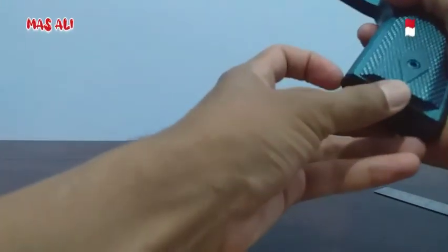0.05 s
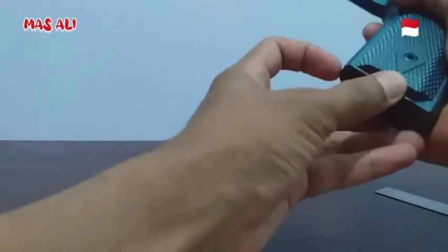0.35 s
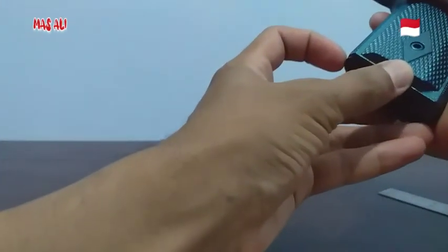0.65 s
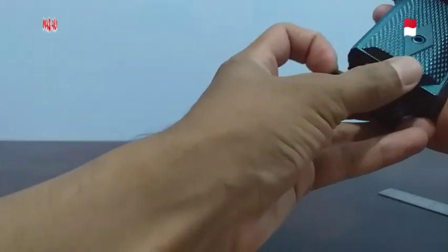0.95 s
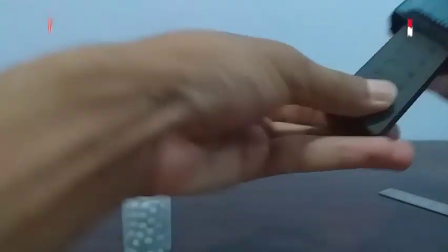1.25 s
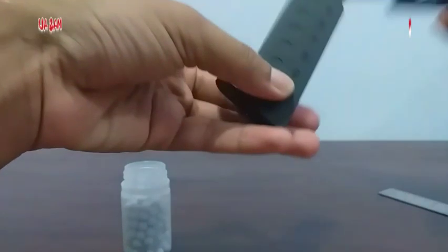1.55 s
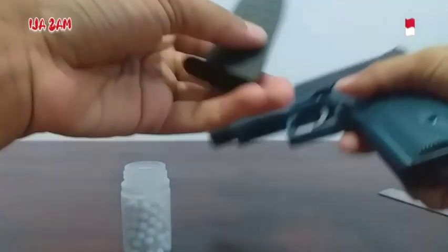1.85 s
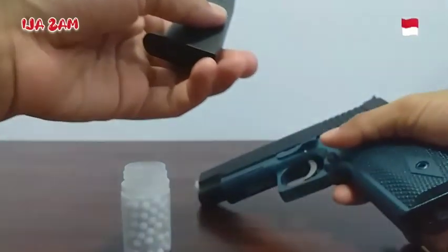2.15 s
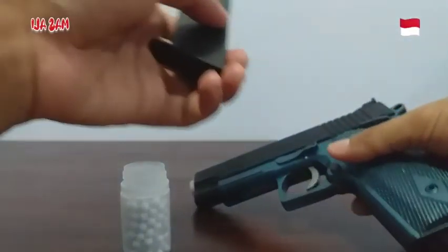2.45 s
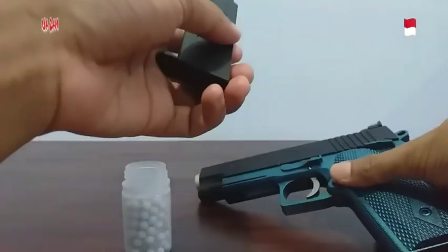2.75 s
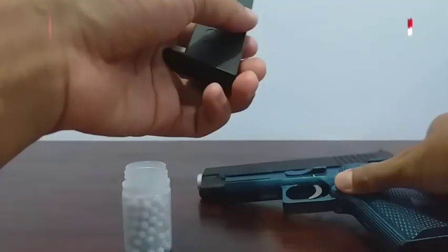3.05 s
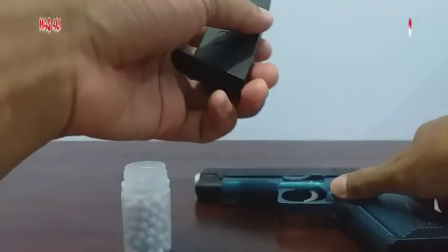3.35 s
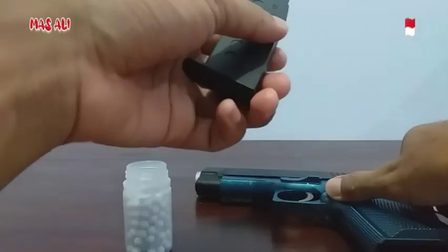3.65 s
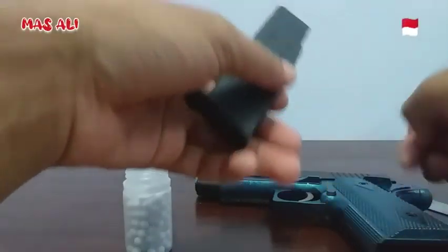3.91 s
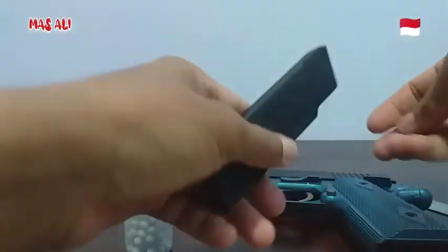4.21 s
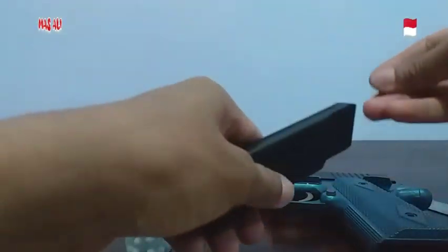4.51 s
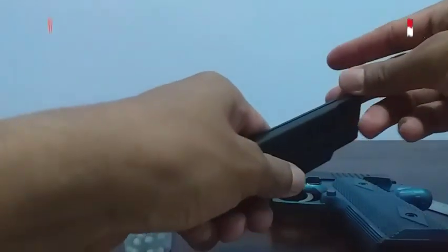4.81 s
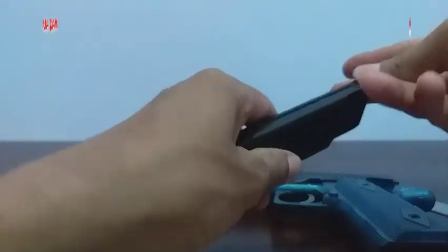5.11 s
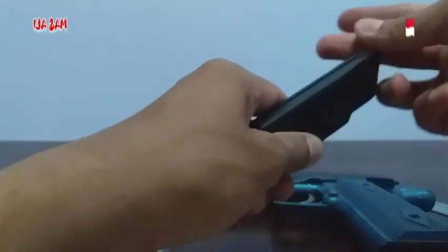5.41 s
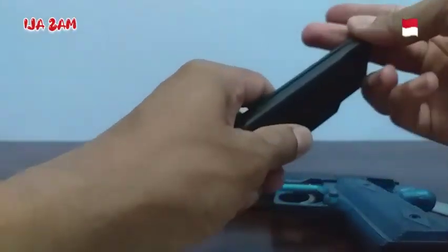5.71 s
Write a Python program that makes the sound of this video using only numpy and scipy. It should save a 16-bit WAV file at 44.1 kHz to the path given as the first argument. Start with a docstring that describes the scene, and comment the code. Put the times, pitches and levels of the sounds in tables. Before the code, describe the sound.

Close plastic clicks and a short scrape, a booming thump on a table, then a sharp spring snap and clack in a small room.

```python
"""A small, bare room, a stereo microphone close to a wooden table, the action straight ahead.
A plastic spring pistol is handled: the catch clicks and the magazine scrapes out, ever faster.
The muzzle taps the table; the pistol is laid down with a boom and pushed along the top.
The magazine's spring follower snaps and chatters, so hard that the limiter ducks and slowly recovers,
and its lips clack under the fingers. Low room tone and microphone hiss lie behind it all."""
import sys
import numpy as np
from scipy import signal
from scipy.fft import rfft, irfft, next_fast_len
from scipy.io import wavfile
from scipy.ndimage import uniform_filter1d, minimum_filter1d, map_coordinates

SR = 44100
rng = np.random.default_rng(int(sys.argv[2]) if len(sys.argv) > 2 else 0)


def log_audio(samples):
    """Write samples as a 16-bit WAV file to the path given in sys.argv[1]."""
    # one column per channel
    frames = np.atleast_2d(samples).T
    # limit to full scale, then quantise
    limited = np.clip(frames, -1, 1)
    pcm = np.round(limited * 32767).astype(np.int16)
    wavfile.write(sys.argv[1], SR, pcm)


N = 258911

# Plastic contacts in the grip, close up.
# Each row: start in seconds, level in dB, scuff length in seconds, brightness in dB per octave.
GRIP_CLICKS = [(0.362, -54, 0.011, -3), (.397, -47, 0.014, 3.5), (0.503, -56.5, 0.0087, 2),
               (.632, -38.5, 0.011, 2), (0.8431, -34.5, .05, 0.5), (.859, -32, 0.024, -0.5),
               (0.9586, -43.5, 0.0046, -1), (1.0765, -45, 0.0042, 9), (1.153, -33.5, 0.031, 0),
               (1.171, -30.5, 0.019, -1), (1.209, -31.5, 0.0043, 4), (1.228, -25, 0.011, 0.5),
               (1.248, -35, 0.021, 6.5), (1.461, -50.5, 0.0035, 3.5), (1.608, -49.5, 0.0084, 3)]
# The colour of the hollow grip. Each row: frequency in Hz, level in dB.
GRIP_COLOUR = [(100, -18), (600, -10), (810, 4.5), (1050, 0.5), (1300, 4), (1650, 0), (2100, 2),
               (3000, -3.5), (4200, -6.5), (6000, -7), (7700, -12), (9000, -23), (15500, -25)]
# The ring of its shell. Each row: frequency in Hz, level in dB, time to fall 60 dB in seconds.
GRIP_MODES = [(863, 5, 0.042), (998, 8, 0.036), (1410, -1, 0.02), (2036, 3.5, 0.036), (2595, -7.5, 0.02),
              (3414, 4, 0.024), (4230, 1.5, 0.014), (5320, -8.5, 0.015), (5970, -9.5, 0.018)]
def grip():
    """The catch lets go and one quickening pull scrapes the magazine out through the hollow grip."""
    clicks = blows(GRIP_CLICKS, GRIP_COLOUR, GRIP_MODES,
                   ring_db=-8, scuff_db=27, wet_db=-8, rise_s=0.00077)
    shell = body(GRIP_COLOUR, tilt_db=3) + amp(-6.5) * ring(GRIP_MODES)
    grit = unit(signal.fftconvolve(slips(rate=4000, spread_db=3.5), shell)[:N])
    pull = stroke(start_s=1.042, length_s=0.19, db=-32, swell_db=18, attack_s=0.002, release_s=0.0081)
    scrape = room(pull * grit, wet_db=-11.5)
    return clicks + scrape + hand_thuds([(s, db - 28) for s, db, _, _ in GRIP_CLICKS])


# The follower's snaps; the third is the loudest thing at the microphone.
# Each row: start in seconds, level in dB, level of the thud in the hand in dB.
SNAPS = [(4.766, -32, -42), (4.793, -39.5, -60), (5.07, -2.5, -24), (5.403, -43, -70)]
# The follower's bright colour. Each row: frequency in Hz, level in dB.
FOLLOWER_COLOUR = [(200, -36), (1700, -24.5), (2300, -11.5), (3000, -12), (3950, -2), (4500, -8),
                   (5100, -0.5), (6200, 1.5), (7300, 3.5), (7900, 3), (8900, -16.5), (12000, -14.5),
                   (15500, -16.5)]
# Its ring. Each row: frequency in Hz, level in dB, time to fall 60 dB in seconds.
FOLLOWER_MODES = [(4046, 3, 0.073), (4130, -1, 0.066), (5020, 3.5, .04), (6400, 1.5, .03),
                  (7100, 11.5, 0.042), (7700, -3, .05)]
def follower():
    """The magazine's sprung follower snaps and jolts the hand; only a hard snap sets it chattering."""
    chatter_above_db = -20
    hits = []
    for s, db, _ in SNAPS:
        hits += rebounds(s, db, gap_s=0.005, change_db=-9.5, count=4 if db > chatter_above_db else 0)
    rows = contacts(hits, scuff_s=0.0048, tilt_db=1, tilt_per_db=0)
    snaps = blows(rows, FOLLOWER_COLOUR, FOLLOWER_MODES,
                  ring_db=-9.5, scuff_db=28.5, wet_db=-8, rise_s=0.0015)
    return snaps + hand_thuds([(s, thud_db) for s, _, thud_db in SNAPS])


# The magazine's lips, close and fairly dry. Each row: start in seconds, level in dB.
CLACKS = [(5.5674, -34), (5.590, -51), (5.7481, -17)]
# Their colour. Each row: frequency in Hz, level in dB.
LIP_COLOUR = [(200, -44), (1500, -22.5), (2100, -6.5), (2750, 4), (3250, -3), (3800, 5), (4400, -10),
              (5000, 1.5), (6100, -4), (7300, -0.5), (8100, -9.5), (9000, -18), (11500, -18),
              (15500, -18.5)]
# Their ring. Each row: frequency in Hz, level in dB, time to fall 60 dB in seconds.
LIP_MODES = [(2760, -20, 0.013), (3710, -20, .015), (5390, -9, 0.028), (5270, -7, 0.022), (7500, 13, 0.021)]
def lips():
    """The two lips click under the fingers, one just after the other."""
    hits = []
    for s, db in CLACKS:
        hits += rebounds(s, db, gap_s=0.0038, change_db=-1, count=1)
    rows = contacts(hits, scuff_s=0.0093, tilt_db=3.5, tilt_per_db=1.03)
    return blows(rows, LIP_COLOUR, LIP_MODES, ring_db=-7, scuff_db=15, wet_db=-9.5, rise_s=0.00043)


# The colour of the muzzle on wood. Each row: frequency in Hz, level in dB.
MUZZLE_COLOUR = [(40, -30.5), (95, 0.5), (170, -4.5), (450, -3), (720, 0), (1200, -9.5), (2000, -11),
                 (2500, -19.5), (3500, -19), (5000, -21), (6000, -26.5), (7000, -23), (9000, -42.5),
                 (15500, -44.5)]
# The ring of that tap. Each row: frequency in Hz, level in dB, time to fall 60 dB in seconds.
MUZZLE_MODES = [(107, -15.5, 0.25), (630, 6.5, 0.087), (690, 6, 0.07), (808, 3, 0.07), (1100, -8.5, .05),
                (1218, 5, 0.03)]
def muzzle():
    """The barrel end taps the table and bounces once, almost as hard."""
    taps = rebounds(s=2.0525, db=-24, gap_s=0.0055, change_db=-0.5, count=1)
    rows = contacts(taps, scuff_s=0.013, tilt_db=0.5, tilt_per_db=0.5)
    return blows(rows, MUZZLE_COLOUR, MUZZLE_MODES, ring_db=-2, scuff_db=6, wet_db=-3, rise_s=0.0011)


# The frame lands on the table in front of the microphone. Each row: start in seconds, level in dB.
THUMPS = [(2.659, -9), (2.674, -19.5), (3.439, -34.5), (3.489, -28.5)]
# The colour of the wooden top. Each row: frequency in Hz, level in dB.
TABLE_COLOUR = [(42, -47.5), (68, -12), (130, -15), (220, -7), (290, 1.5), (460, -7), (560, -12),
                (900, -23.5), (1900, -25.5), (2600, -32), (3700, -32.5), (7500, -38), (9000, -53.5),
                (15500, -53)]
# Its ring. Each row: frequency in Hz, level in dB, time to fall 60 dB in seconds.
TABLE_MODES = [(275, 3, 0.075), (409, -4.5, 0.064), (622, -17.5, .2), (826, -19, .1), (1179, -20, .08)]
# The room's standing waves. Each row: frequency in Hz, level in dB, time to fall 60 dB in seconds.
STANDING_WAVES = [(68, -9.5, .6), (108.76, 9, 0.88), (164, -8.5, .6), (192, -11.5, 1), (253, -15.5, 0.95),
                  (461, -10.5, .55)]
def table_thumps():
    """The table top booms under the pistol's weight; the flat, heavy contact hardly scuffs."""
    rows = contacts(THUMPS, scuff_s=0.0054, tilt_db=-1.5, tilt_per_db=0.12)
    thumps = blows(rows, TABLE_COLOUR, TABLE_MODES,
                   ring_db=-6.5, scuff_db=-14, wet_db=-4.5, rise_s=0.0013)
    for s, db in THUMPS:
        add(thumps, s, amp(db - 20) * onset_unit(ring(STANDING_WAVES)))  # bass lingers between the walls
    return thumps


# The low colour of the juddering table. Each row: frequency in Hz, level in dB.
JUDDER_COLOUR = [(30, -48), (48, -20), (70, 3.5), (140, 3.5), (200, 7), (420, -5), (600, -15.5),
                 (1500, -29), (4000, -39), (9000, -53)]
def table_drag():
    """Pushed along, the pistol sticks and slips, and table and room rumble."""
    push = stroke(start_s=3.165, length_s=0.39, db=-38.5, swell_db=7, attack_s=0.0076, release_s=0.033)
    judder = push * unit(slips(rate=600, spread_db=1.5))
    resonance = body(JUDDER_COLOUR) + amp(-3) * ring(STANDING_WAVES)
    return room(signal.fftconvolve(judder, resonance)[:N], wet_db=-3.5)


# Faint ticks from inside the pistol. Each row: start in seconds, level in dB.
TICKS = [(2.876, -49.5), (3.392, -60), (3.463, -55.5), (3.4914, -38), (3.5782, -40.5)]
# Their thin colour. Each row: frequency in Hz, level in dB.
TICK_COLOUR = [(500, -13), (2600, -21), (3400, 4), (4200, 12), (5200, -2), (7000, -2), (9000, -48),
               (15500, -32)]
# Their ring. Each row: frequency in Hz, level in dB, time to fall 60 dB in seconds.
TICK_MODES = [(3950, -2, 0.0071), (3840, 0, 0.013)]
def loose_parts():
    """Loose parts tick as the pistol settles."""
    rows = contacts(TICKS, scuff_s=0.0079, tilt_db=-5.5, tilt_per_db=-0.03)
    return blows(rows, TICK_COLOUR, TICK_MODES, ring_db=-28, scuff_db=0, wet_db=-11, rise_s=0.00036)


# The dull colour of the palm. Each row: frequency in Hz, level in dB.
PALM_COLOUR = [(30, -5.5), (110, 15.5), (280, 3.5), (700, -8), (1500, -29), (4000, -52.5)]
def hand_thuds(jolts):
    """The holding hand takes each (seconds, dB) jolt with a thud."""
    track = np.zeros(N)
    thud = onset_unit(body(PALM_COLOUR))
    for s, db in jolts:
        add(track, s, amp(db) * thud)
    return room(track, wet_db=-8)


# Finger movements, faint even this close. Each row: start in seconds, length in seconds, level in dB.
BRUSHES = [(0.025, .55, -67.5), (1.54, .04, -59), (1.70, 0.077, -56.5), (1.835, 0.022, -58),
           (2.46, 0.048, -58.5), (5.608, 0.012, -50)]
# The colour of skin on plastic. Each row: frequency in Hz, level in dB.
SKIN_COLOUR = [(200, -32), (1200, 1.5), (3500, 8), (6500, 8), (7800, -2), (9000, -4.5), (12000, -5.5),
               (15500, -8)]
def fingers():
    """Skin brushes over the textured plastic."""
    pressure = sum(stroke(*brush, swell_db=2, attack_s=0.012, release_s=0.018) for brush in BRUSHES)
    friction = unit(coloured(slips(rate=1000, spread_db=0), SKIN_COLOUR))
    return room(pressure * friction, wet_db=-9)


# First echoes off the near walls. Each row: delay in seconds, level against the direct sound in dB.
WALL_ECHOES = [(.0042, -24), (0.0152, -16.5), (0.0161, -12.5)]
def walls(x):
    """The direct sound reaches the microphone, then its first few echoes."""
    return x + sum(amp(db) * np.pad(x, (round(delay * SR), 0))[:N] for delay, db in WALL_ECHOES)


# The bare room's reverberation. Each row: frequency in Hz, time to fall 60 dB in seconds.
ROOM_DECAY = [(50, 0.98), (110, 0.98), (210, 1), (560, 1), (1470, 1), (3880, 0.8), (7500, 0.51),
              (14000, 0.56)]
def tail():
    """A fresh diffuse room tail of energy 1; the treble dies first."""
    hz, t, noise = signal.stft(rng.standard_normal(SR), SR, nperseg=256)
    decay = amp(-60 * t / along(ROOM_DECAY, hz)[:, None])
    response = signal.istft(noise * decay, SR, nperseg=256)[1][:SR]
    response *= 1 - np.exp(-np.arange(SR) / SR / 0.0013)  # soft onset
    return response / np.linalg.norm(response)


def room(x, wet_db):
    """A sound as the microphone hears it: direct, off the walls, and a tail at wet_db."""
    return walls(x) + amp(wet_db) * signal.fftconvolve(x, tail())[:N]


# The colour of room tone and hiss. Each row: frequency in Hz, level in dB.
AIR_COLOUR = [(15, -54.5), (25, -20.5), (70, -.5), (125, 2.5), (309, -10.5), (516, -14.5), (1160, -22),
              (1400, -19.5), (2110, -27), (3820, -22.5), (5880, -30.5), (7510, -14), (8590, -41),
              (14400, -31.5), (16000, -31.5)]
# Their stereo width. Each row: frequency in Hz, side level against mid in dB.
AIR_WIDTH = [(300, -51.5), (1300, -44.5), (2400, -33.5), (4400, -28), (7500, -30.5), (9000, -2),
             (15000, -11)]
def air():
    """Low room tone, alike in both channels, and microphone hiss that differs between them."""
    mid = unit(coloured(rng.standard_normal(N), AIR_COLOUR))
    side = coloured(unit(coloured(rng.standard_normal(N), AIR_COLOUR)), AIR_WIDTH)
    return amp(-57.5 + 0.17 * wobble(rate=9.7)) * np.array([mid + side, mid - side])


def blows(rows, colour, modes, ring_db, scuff_db, wet_db, rise_s):
    """Each contact is a push plus a short scuff, heard through the struck body and the room."""
    direct, diffuse = np.zeros(N), np.zeros(N)
    t = np.arange(SR // 16) / SR
    for s, db, scuff_s, tilt_db in rows:
        envelope = (1 - np.exp(-t / rise_s)) * amp(-30 * t / scuff_s)
        scuff = rng.standard_normal(len(t)) * envelope
        force = amp(scuff_db) * scuff / np.linalg.norm(scuff)
        force[0] += 1  # the push
        struck = body(colour, tilt_db) + amp(ring_db) * ring(modes)
        hit = amp(db) * onset_unit(signal.fftconvolve(force, struck[:SR // 2]))
        add(direct, s, hit)
        add(diffuse, s, amp(wet_db) * signal.fftconvolve(hit, tail()))  # hands move: each tail is new
    return walls(direct) + diffuse


def contacts(hits, scuff_s, tilt_db, tilt_per_db):
    """Give (seconds, dB) hits a scuff length and a brightness: tilt_db for the hardest."""
    hardest_db = max(db for _, db in hits)
    return [(s, db, scuff_s, tilt_db + tilt_per_db * (db - hardest_db)) for s, db in hits]


def rebounds(s, db, gap_s, change_db, count):
    """(seconds, dB) of a contact and its rebounds, gap_s apart and change_db against it."""
    return [(s + k * gap_s, db + change_db * (k > 0)) for k in range(count + 1)]


def body(colour, tilt_db=0, size=8192):
    """Minimum-phase impulse response of energy 1, one second long, tilted by tilt_db per octave."""
    hz = np.fft.rfftfreq(size, 1 / SR)
    gain = amp(along(colour, hz) + tilt_db * np.log2(np.clip(hz, 100, 8000)))
    cepstrum = irfft(np.log(gain))
    causal = 2 * cepstrum[:size // 2] * (np.arange(size // 2) > 0)
    response = irfft(np.exp(rfft(causal, size)))
    return np.pad(response / np.linalg.norm(response), (0, SR - size))


def ring(modes):
    """Decaying modes of energy 1, at new signs and strengths for every blow."""
    t = np.arange(SR) / SR
    ringing = np.zeros(SR)
    for hz, db, t60 in modes:
        sign = rng.choice([-1, 1])
        ringing += sign * amp(db + rng.normal(0, 1) - 60 * t / t60) * np.sin(2 * np.pi * hz * t)
    cutoff_hz = 0.7 * min(modes)[0]  # little radiates below the lowest mode
    ringing = signal.sosfilt(signal.butter(2, cutoff_hz, "high", fs=SR, output="sos"), ringing)
    return ringing / np.linalg.norm(ringing)


def stroke(start_s, length_s, db, swell_db, attack_s, release_s):
    """Gain of one rub: it sets in, grows by swell_db towards db as the hand speeds up, and dies away."""
    t = np.maximum(np.arange(N) / SR - start_s, 0)
    to_go = np.maximum(1 - t / length_s, 0)
    attack = 1 - np.exp(-t / attack_s)
    release = np.exp(-np.maximum(t - length_s, 0) / release_s)
    return amp(db - swell_db * to_go) * attack * release


def slips(rate, spread_db):
    """Stick-slip: rate tiny random jerks a second, their sizes scattered by spread_db."""
    jerks = (rng.random(N) < rate / SR) * rng.choice([-1, 1], N)
    return jerks * amp(spread_db * rng.standard_normal(N))


def wobble(rate):
    """A smooth random curve, rate knots a second."""
    knots = rng.standard_normal(int(N * rate / SR) + 4)
    return map_coordinates(knots, [np.arange(N) * rate / SR])


def coloured(x, colour):
    """Filter a signal by (Hz, dB) points."""
    size = next_fast_len(N + SR // 4)
    gain = amp(along(colour, np.fft.rfftfreq(size, 1 / SR)))
    return irfft(rfft(x, size) * gain, size)[:N]


def along(points, hz):
    """Read (Hz, value) points on a log axis."""
    frequencies, values = np.transpose(points)
    return np.interp(np.log(hz + 1), np.log(frequencies), values)


def amp(db):
    """Decibels to gain."""
    return 10 ** (np.asarray(db) / 20)


def unit(x):
    """Scale to rms 1."""
    return x / np.sqrt(np.mean(x ** 2) + 1e-20)


def onset_unit(sound):
    """Scale so that the first 5 ms have rms 1."""
    return sound / np.sqrt(np.mean(sound[:SR // 200] ** 2))


def add(track, s, sound):
    """Mix a sound in at s seconds."""
    start = round(s * SR)
    track[start:start + len(sound)] += sound[:N - start]


# A faint treble fizz between the channels. Each row: frequency in Hz, side level against mid in dB.
TREBLE_FIZZ = [(2400, -71), (4400, -47.5), (8000, -35.5), (15000, -20.5)]
def scene():
    """The handling is centred; a faint treble fizz that follows it is added between the channels."""
    mid = grip() + follower() + lips() + muzzle()
    mid += table_thumps() + table_drag() + loose_parts() + fingers()
    scatter = rng.standard_normal(SR // 100)
    scattered = signal.fftconvolve(mid, scatter / np.linalg.norm(scatter))[:N]
    side = coloured(scattered, TREBLE_FIZZ)
    return np.array([mid + side, mid - side]) + air()


def limiter(x, ceiling_db, recovery_db_per_s):
    """Gain drops just before a peak that would pass the ceiling, then creeps back."""
    window = SR // 500  # 2 ms
    peak = -minimum_filter1d(-np.abs(x).max(0), window)
    excess_db = np.maximum(20 * np.log10(peak + 1e-9) - ceiling_db, 0)
    recovery_db = recovery_db_per_s * np.arange(N) / SR
    cut_db = np.maximum.accumulate(excess_db + recovery_db) - recovery_db
    return x * amp(-uniform_filter1d(cut_db, window))


def record(dry):
    """After the microphone: a low cut, a slow-release limiter, then a steep band limit."""
    low_cut_hz, top_hz = 45, 15850
    lean = signal.sosfilt(signal.butter(4, low_cut_hz, "high", fs=SR, output="sos"), dry)
    held = limiter(lean, ceiling_db=-0.7, recovery_db_per_s=2.5)
    size = next_fast_len(N + SR // 4)
    hz = np.fft.rfftfreq(size, 1 / SR)
    return irfft(rfft(held, size) / (1 + (hz / top_hz) ** 300), size)[:, :N]


dry = scene()
out = record(dry)
log_audio(out)
```